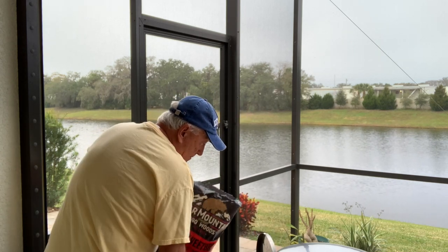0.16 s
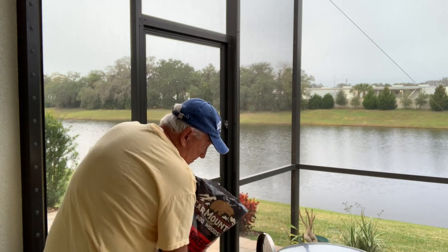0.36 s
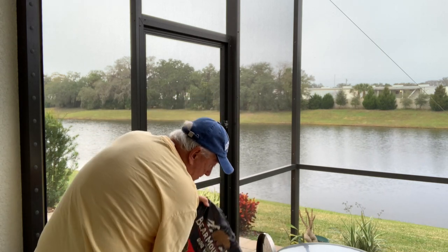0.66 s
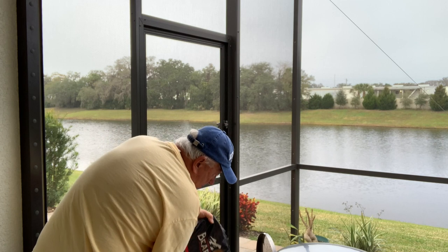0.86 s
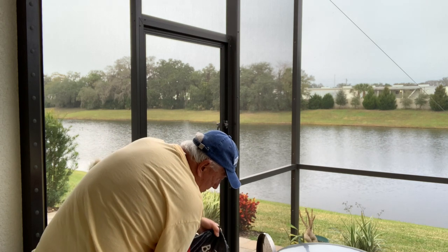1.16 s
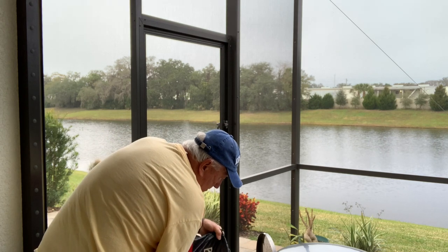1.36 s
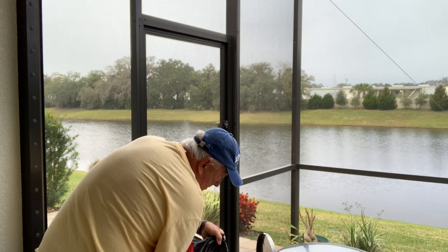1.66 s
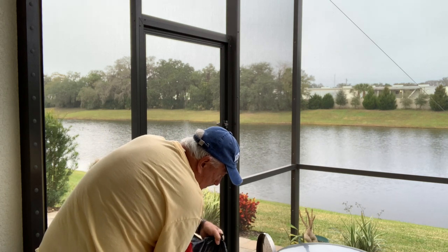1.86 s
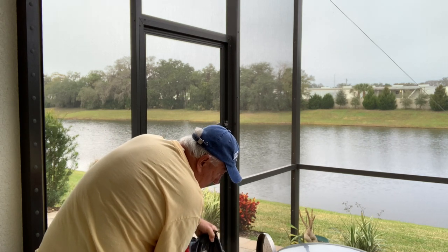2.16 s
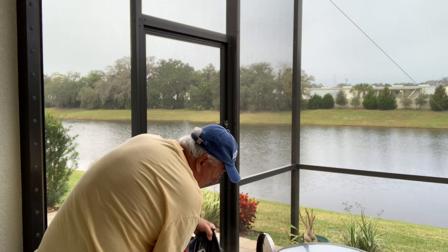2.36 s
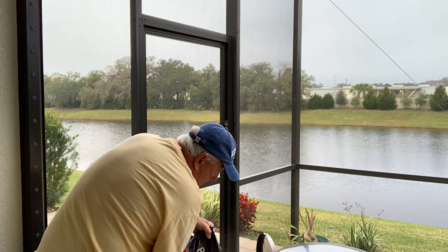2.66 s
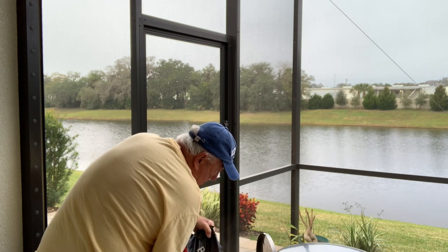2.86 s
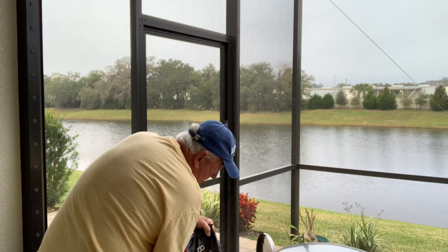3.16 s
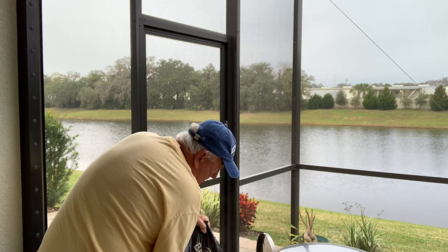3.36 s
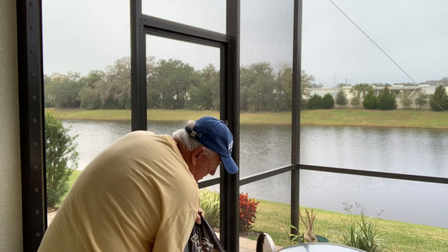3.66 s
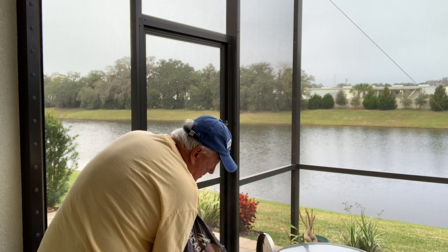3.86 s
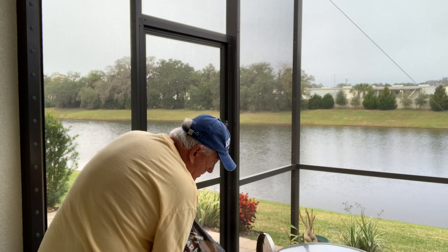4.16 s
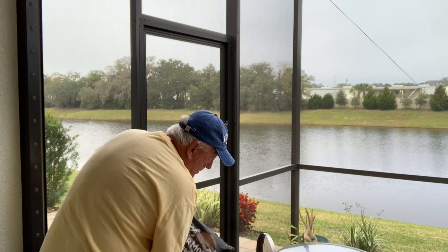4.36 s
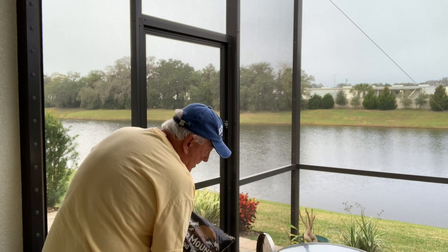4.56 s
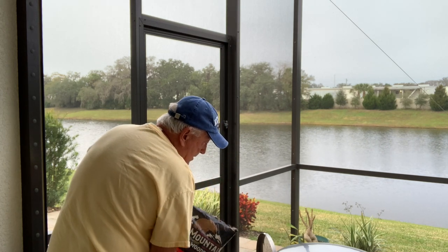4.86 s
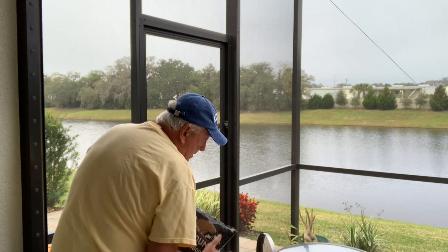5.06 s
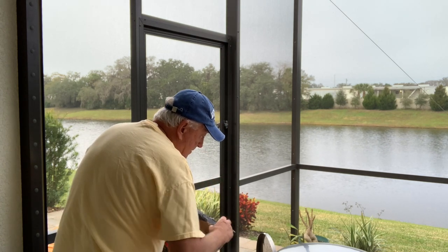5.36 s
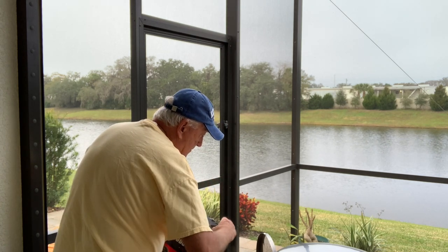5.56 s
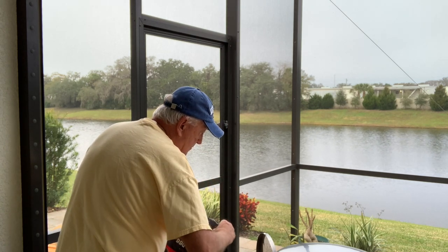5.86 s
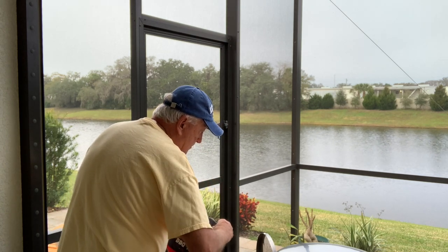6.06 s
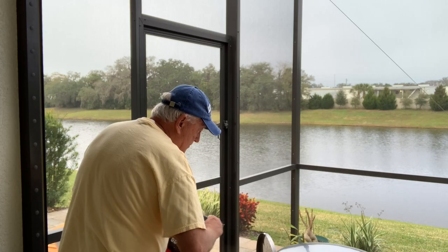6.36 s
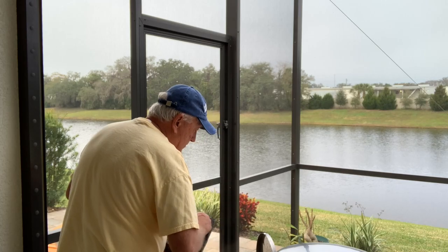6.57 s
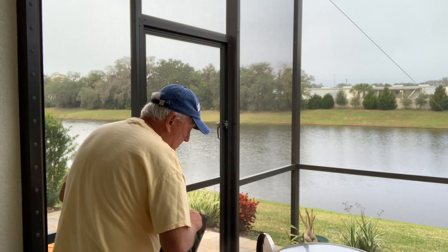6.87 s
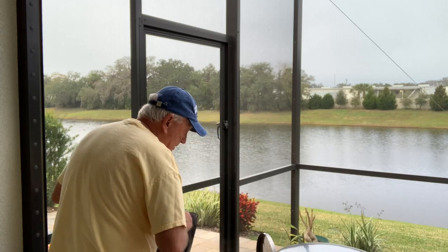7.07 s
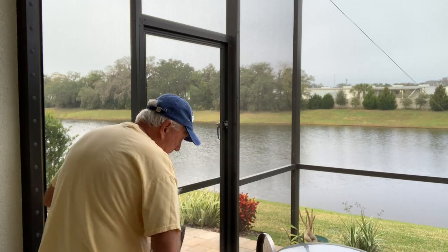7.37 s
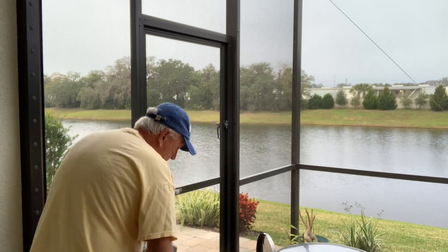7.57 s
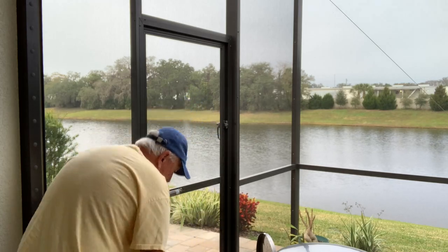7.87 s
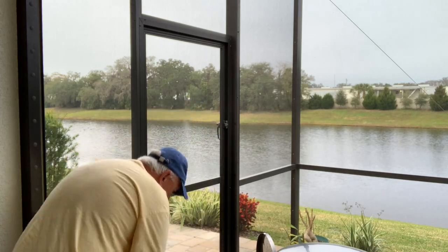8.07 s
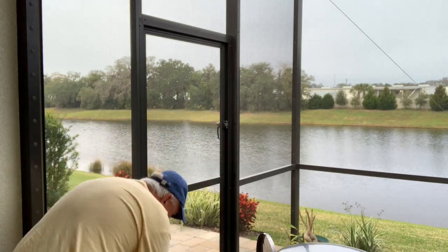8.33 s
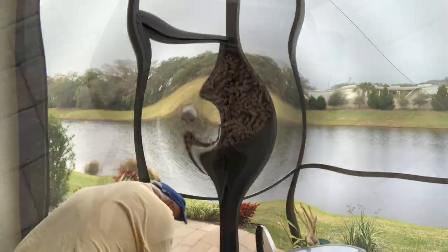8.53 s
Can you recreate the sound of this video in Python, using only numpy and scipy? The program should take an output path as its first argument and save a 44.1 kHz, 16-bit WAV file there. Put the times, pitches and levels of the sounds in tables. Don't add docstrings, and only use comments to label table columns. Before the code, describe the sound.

On a screened porch, a heavy plastic sack of wood pellets crackles and knocks dully in someone's hands. Pellets suddenly pour into an empty steel hopper, pinging, drumming and booming loudly enough to clip, then become muffled as the heap builds. Sharp film snaps follow, then quieter folding and clicking of loose pellets and a rustling set-down. Close stereo handset, faint distant motor hum.

```python
import sys
import numpy as np
from scipy import signal
from scipy.fft import rfft, irfft, next_fast_len
from scipy.io import wavfile
from scipy.ndimage import uniform_filter1d, minimum_filter1d, map_coordinates

SR = 44100
rng = np.random.default_rng(int(sys.argv[2]) if len(sys.argv) > 2 else 0)


def generate_wav(signal):
    frames = np.transpose(np.atleast_2d(signal))
    scaled = np.clip(frames, -1, 1) * 32767
    pcm = np.round(scaled).astype(np.int16)
    wavfile.write(sys.argv[1], SR, pcm)


def invert_db(x):
    u = np.asarray(x, float) / 20
    return 10 ** u


N = 383669

# f/Hz, level/dB [per Hz]
SLIDE = [(250, -36.5), (500, -5.5), (900, 0), (1600, -0.5), (2500, -5), (4000, -12), (7000, -25)]
# f/Hz, level/dB [per Hz]
FILM = [(900, -29), (2000, -4), (3000, -1.5), (5000, 2.5), (7500, 2), (9500, -12), (11500, -22),
        (14000, -5.5)]
# f/Hz, level/dB [per Hz]
FIZZ = [(5000, -22), (8000, -14), (11000, 12), (13500, 8), (15500, 5), (18000, 2.5)]


def unit(x):
    return x / np.sqrt(np.mean(x ** 2) + 1e-20)


def along(points, hz):
    f, v = np.transpose(points)
    return np.interp(np.log(hz + 1), np.log(f + 1), v)


def curves(rows):
    s, *cols = np.transpose(rows)
    return [np.interp(np.arange(N) / SR, s, c) for c in cols]


def wobble(rate):
    knots = rng.standard_normal(int(N * 200 / SR) + 4)
    return map_coordinates(knots, [np.arange(N) * min(rate, 200) / SR])


def filtered(x, response):
    m = next_fast_len(N + 8192)
    return irfft(rfft(x, m) * response(np.fft.rfftfreq(m, 1 / SR)), m)[..., :N]


def colour(points):
    return lambda hz: invert_db(along([(0.95, -120)] + list(points) + [(SR / 2, -60)], hz))


def modes(peaks):
    def response(f):
        total = 0
        for k, (c, w, db) in enumerate(peaks):
            total = total + (-1) ** k * invert_db(db) * 1j * f * w / (c * c - f * f + 1j * f * w)
        return total
    return response


def grains(rate, spread_db, clump_db, smooth):
    when, size, sign = rng.random((3, N))
    hits = (when < rate / SR) * invert_db(-spread_db * np.log(size + 0.022)) * np.sign(sign - .5)
    bed = rng.standard_normal(N)
    clumps = invert_db(clump_db * (0.12 * wobble(20) + 2.06 * wobble(60)))
    return unit(clumps * (unit(hits) + smooth * bed))


def yard():
    # f/Hz, level/dB [per Hz]
    open_air = [(24, -32.5), (40, -4), (117, 5), (294, -5.5), (637, -4), (1190, -8), (1310, -9.5),
                (1730, -9.5), (2110, -13), (3930, -16.5), (7520, -27.5), (11200, -34.5), (15500, -69)]
    # t/s, level/dB
    breeze = [(0.0, -33), (0.14, -48), (0.22, -39), (0.89, -39.5), (1.52, -39), (1.57, -44.5),
              (2.93, -39.5), (3.08, -44.5), (4.07, -37.5), (4.56, -44), (4.7, -42.5), (5.96, -44.5),
              (6.47, -40.5), (8.33, -43), (8.51, -34.5), (8.7, -38)]
    a, b = filtered(rng.standard_normal((2, N)), colour(open_air))
    # f/Hz, ratio
    likeness = [(40, 3.4), (60, 4.2), (300, 0.3), (700, 1.06), (6000, 0.88), (10000, 0.75),
                (12500, 2.3), (15500, 27)]
    a = filtered(a, lambda hz: along(likeness, hz))
    motor = filtered(rng.standard_normal(N), modes([(119, 7.5, 0)]))
    air = unit(np.array([a + b, a - b])) + invert_db(-4.5) * unit(motor)
    bass = filtered(air, lambda hz: 1 / (1 + (hz / 180) ** 4))
    rumble_db, = curves(breeze)
    air_db = -44 + .6 * wobble(2.7)
    return invert_db(rumble_db - 1.5) * unit(bass) + invert_db(air_db) * (air - bass)


def sack():
    # t/s, effort level/dB, tautness of the film/dB
    hands = [(0, -33.5, -4.5), (.29, -42, -2.5), (.38, -30.5, -9.5), (.56, -29.5, -8.5), (.76, -32.5, -9),
             (.945, -35, -4), (.975, -25.5, -3.5), (1.06, -29.5, -0.5), (1.2, -23.5, 4), (1.3, -18.5, 2.5),
             (1.7, -14, -1), (1.9, -24.5, 0.5), (2.57, -33, -0.5), (4.5, -42, -4.5), (4.95, -51.5, -5.5),
             (5.25, -59.5, 0), (5.95, -58.5, -3.5), (6.45, -37, -8.5), (7.1, -50, -9.5), (7.3, -57.5, -4),
             (8.25, -70, -11.5)]
    # peak t/s, fading time/s, effort level/dB, tautness/dB
    grips = [(0.051, 0.04, -31.5, -12), (.15, 0.055, -29.5, -5.5), (0.178, 0.062, -29, -14),
             (1.018, 0.073, -28.5, 11.5), (1.063, .035, -16, 6.5), (1.11, .03, -21.5, 7.5),
             (1.246, 0.042, -15, 4), (1.291, .03, -19, 2), (1.326, 0.066, -11.5, 2), (1.355, .05, -16, 0.5),
             (1.408, 0.13, -14, 2), (1.54, 0.041, -10, 0.5), (1.614, 0.059, -13, 0),
             (1.645, 0.042, -21.5, 3), (1.714, 0.045, -21, -3), (1.978, .05, -31.5, 5),
             (3.047, 0.019, -36.5, 8), (3.098, 0.14, -28.5, 2), (3.135, 0.088, -28, -4.5),
             (3.17, 0.23, -28, 1), (3.46, 0.23, -32.5, 1), (3.57, 0.57, -35, 3.5), (3.83, 0.15, -47.5, 14),
             (4.072, 0.22, -35, -8.5), (4.408, 0.038, -40, -14), (4.511, 0.04, -36.5, -11),
             (4.645, 0.18, -32, -9.5), (4.701, .2, -34, -7.5), (4.75, .2, -31.5, -8),
             (4.791, 0.035, -30.5, -11), (4.83, 0.25, -33.5, -5.5), (4.865, .03, -36, -14),
             (4.887, 0.051, -32.5, -8), (4.92, 0.049, -45, -6), (5.14, 0.22, -46.5, -9),
             (5.5, 0.086, -41, -8), (5.6, .1, -48.5, -6), (5.68, .1, -48.5, -9.5), (5.835, .08, -52.5, -7),
             (5.94, 0.065, -48, -7), (6.13, 0.089, -43.5, -6), (5.42, 0.046, -45, -3),
             (6.25, 0.047, -39.5, -11.5), (6.398, 0.032, -38, -4), (6.64, 0.055, -49, -26.5),
             (6.81, 0.11, -37, -9), (6.979, 0.13, -37.5, -11.5), (7.072, 0.15, -37, -8),
             (7.409, 0.09, -40.5, -5), (7.53, 0.27, -49.5, -9), (7.83, 0.052, -65.5, -9),
             (8.213, 0.034, -41, -5), (8.33, 0.05, -42, 9), (8.383, 0.17, -19.5, -3.5),
             (8.422, 0.43, -23.5, -10.5)]
    # f/Hz, level/dB [per Hz]
    trapped_air = [(60, -35), (110, -12), (170, -4.5), (280, -1), (450, -2), (800, -9.5), (1500, -26.5)]
    per_taut = np.array([-1.033, 0.28, 1.3, 0.6])[:, None]
    per_effort = np.array([0.78, 0.99, 1.0, .93])[:, None]
    usual_db = -35
    rise, fade_db = 0.37, 25.5
    pour_start_s, pour_end_s, pouring_db = .96, 1.85, -7
    turned_s, turned_db = 6.8, -9.5
    t = np.arange(N) / SR

    def power_of(effort_db, taut_db):
        return invert_db(2 * (usual_db + per_effort * (effort_db - usual_db) + per_taut * taut_db))

    power = power_of(*curves(hands))
    for s, fading, db, taut in grips:
        near = slice(max(round((s - 2 * fading) * SR), 0), round((s + 2 * fading) * SR))
        gone = np.where(t[near] < s, (s - t[near]) / rise, t[near] - s) / max(fading, .01)
        power[:, near] += power_of(db, taut) * invert_db(-2 * fade_db * gone)
    thud_gain, slide_gain, film_gain, fizz_gain = np.sqrt(power)

    falling = uniform_filter1d(1.0 * (t > pour_start_s) * (t < pour_end_s), size=4000)
    slide_gain = slide_gain * invert_db(pouring_db * falling)
    shade_db = turned_db / (1 + np.exp(-(t - turned_s) / .05))

    thud_grains = grains(300, spread_db=2.0, clump_db=1.4, smooth=1.0)
    thud = unit(filtered(thud_grains, colour(trapped_air)))
    slide_grains = grains(1500, spread_db=0.0, clump_db=.8, smooth=0.63)
    slide = unit(filtered(slide_grains, colour(SLIDE)))
    creases = grains(3000, spread_db=1, clump_db=1.3, smooth=0.92)
    film = unit(filtered(creases, colour(FILM)))
    fizz = unit(filtered(creases, colour(FIZZ)))
    loose_pellets = grains(120, spread_db=2.5, clump_db=4.5, smooth=.1)
    strays = unit(filtered(loose_pellets, colour([(700, -28.5), (1500, -8.0), (3500, 8), (7000, -14.5)])))

    low = invert_db(-10.5) * thud_gain * thud
    middle = slide_gain * (invert_db(-1.0) * slide + invert_db(-13) * strays)
    high = invert_db(0.1) * film_gain * film + invert_db(shade_db - 5.0) * fizz_gain * fizz
    return low + middle + high


def knocks():
    # t/s, peak level/dB, f/Hz, t60/s
    blows = [(0.312, -17, 794, 0.024), (.312, -19.5, 1150, 0.024), (0.554, -18, 790, 0.019),
             (4.016, -27, 224, 0.029), (5.05, -30, 200.6, 0.026), (5.412, -33, 2300, 0.012),
             (5.464, -33, 1920, 0.02), (5.496, -20, 1380, 0.011), (5.94, -35.5, 1590, 0.016),
             (5.483, -31, 1620, 0.01), (5.589, -35, 1370, .015), (5.826, -41, 1580, 0.018),
             (5.88, -35, 1610, 0.013), (5.995, -35, 1630, .015), (6.007, -37, 1070, .015),
             (6.307, -42, 1810, 0.0099), (6.382, -26, 1380, .015), (6.495, -29, 1708, 0.017),
             (6.711, -35, 1740, 0.012), (6.885, -34, 1130, 0.026), (7.402, -29, 1430, .015),
             (8.212, -31, 1100, .015), (8.26, -39, 1380, .015), (3.139, -26, 1050, 0.027),
             (3.158, -26, 1470, .03), (4.79, -20.5, 705, 0.021), (3.374, -34, 340, 0.028),
             (5.665, -26.5, 530, 0.011), (6.119, -21.5, 1620, 0.014), (6.356, -24, 292, 0.024),
             (6.392, -17.5, 1500, 0.017), (6.509, -31, 1076, 0.098), (6.67, -30, 316, 0.057),
             (7.078, -32, 277, 0.019), (7.379, -30, 700, 0.015), (7.535, -38, 205, 0.07),
             (7.534, -25, 1700, 0.016), (7.536, -32, 2320, 0.014), (7.727, -32.5, 576, 0.024),
             (7.786, -34, 2580, 0.019), (7.816, -37, 2030, 0.019), (8.152, -33, 1500, 0.008),
             (8.383, -22, 494, 0.053), (8.491, -32, 453, 0.05)]
    slump_s, slump_db, slump_t60 = .162, -28, 0.45
    slump_hz, sink_s = 300, .028
    out, cracks, t = np.zeros(N + SR), np.zeros(N + SR), np.arange(SR // 4) / SR
    for s, db, hz, t60 in blows:
        at = slice(round(s * SR), round(s * SR) + len(t))
        turns = 2 * np.pi * hz * (t - (hz < 350) * 3 * t * t)
        note = np.sin(turns) + 0.21 * np.sin(1.3 * turns)
        out[at] += invert_db(db + 5.0 - 60 * t / t60) * (1 - np.exp(-t / 0.0013)) * note
        cracks[at] += (hz > 350) * invert_db(db + 0.5 - 60 * t / 0.032) * rng.standard_normal(len(t))
    turns = 2 * np.pi * np.cumsum(100 + slump_hz * np.exp(-t / sink_s)) / SR
    swell = invert_db(slump_db - 60 * t / slump_t60) * (1 - np.exp(-t / 0.0067))
    out[round(slump_s * SR):][:len(t)] += swell * np.sin(turns)
    return out[:N] + filtered(cracks[:N], colour(SLIDE))


def snaps():
    # t/s, peak level/dB, low part/dB, high part/dB
    ticks = [(0.2216, -21, -30, -19), (0.2732, -26, -8, -5), (0.8201, -23, -11, -28.5),
             (3.8165, -16.5, -35, 4), (4.0532, -13.5, -21, -2.5), (4.1626, -26, -17, -14),
             (4.3935, -15.5, -31, -6), (4.576, -36, -19, 9.5), (5.0836, -37, -4, -21),
             (5.1078, -41, 4, -22), (5.15, -37.5, -8, -27.5), (5.2844, -39, 2, -38),
             (5.5855, -38.5, -7, -25), (6.069, -23, -12, -25), (6.122, -23.5, -13, -41.5),
             (6.2102, -43, 7, -11), (6.352, -37.5, 4, -18), (6.391, -23, -6, -41.5), (6.462, -33, 2, -28),
             (6.7321, -25.5, -6, -33), (6.782, -26, -9, -9.5), (6.961, -28.5, -12, -11.5),
             (7.0522, -26.5, -4.5, -28.5), (7.38, -27, -7, -20.5), (7.534, -23, -14, -19.5),
             (7.784, -42, -1.5, -33), (7.813, -32.5, -3, -45), (8.152, -36, 2, -30), (8.313, -31, -12, -25),
             (6.033, -32.5, -12, -19), (5.663, -43, -6.5, -25), (8.012, -23.5, -17.5, -16),
             (8.0767, -19.5, -21, -11.5), (8.2887, -19.5, -21, -54), (8.412, -31.5, -13, -12.5),
             (8.6514, -19, -15, -9.5)]
    # t/s, peak level/dB, low part/dB, high part/dB
    folds = [(0.96, -5.5, -43, -14), (1.0138, -6.5, -12, -12.5), (2.485, -13, -34, -6), (2.57, -6, -28, -7),
             (2.6054, -13.5, -30, -8.5), (2.657, -16.5, -9, 2.5), (2.8, -24, 1.5, -9),
             (2.8698, -8.5, -27, -16.5), (3.042, -37.5, 13.5, -20.5), (3.089, -11, -15, -21.5),
             (3.4393, -8.5, -12.5, -15.5), (3.552, -5, -24, -7), (3.5709, -3.5, -18, -7),
             (3.687, -13.5, -13, -11), (3.8012, -13, -34, -14), (3.814, 3, -41, -19),
             (4.151, -23.5, -4, 1.5), (4.345, -18.5, -9, -10), (4.6184, -30, -24, -0.5),
             (4.6872, -18.5, -16, -7), (4.7294, -20.5, -19, -7), (4.786, -22, -3, -3),
             (5.995, -31, -17, -10), (6.0354, -32, -12, -3), (6.2422, -30, -5, -23),
             (6.5082, -27.5, 4, -33), (8.355, -15, -30, -14), (8.3994, -19, -13, 8),
             (8.6049, -21.5, -4, -17), (8.67, -27.5, -5, -16)]
    parts, t = np.zeros((3, N + SR)), np.arange(SR // 8) / SR

    def add(s, db, low_db, high_db, shape):
        tones = rfft(rng.standard_normal(len(t)) * shape)
        even = irfft(tones / (abs(tones) + .15 * abs(tones).mean()), len(t))
        even = even * np.clip(8 * shape / shape.max(), 0, 1)
        burst = even * np.linalg.norm(shape) / np.linalg.norm(even)
        gains = invert_db(np.array([[db + low_db + 17.0], [db + 0.5], [db + high_db + .1]]))
        parts[:, round(s * SR):][:, :len(t)] += gains * burst

    rise_s, echo_s = 0.0029, .0023
    for fold in folds:
        add(*fold, 0.29 * t / rise_s * np.exp(1 - t / rise_s))
    for tick in ticks:
        crack = 0.33 * invert_db(-60 * t / 0.0018)
        off_tiles = 0.89 * (t > echo_s) * invert_db(-60 * (t - echo_s) / 0.0093)
        add(*tick, crack + off_tiles)
    return sum(filtered(p[:N], colour(c)) for p, c in zip(parts, (SLIDE, FILM, FIZZ)))


def stream():
    # t/s, level/dB
    flow = [(.945, -68), (.965, -47.5), (1.02, -38), (1.065, -31), (1.2, -32), (1.28, -30), (1.308, -24),
            (1.35, -24.5), (1.385, -34.5), (1.41, -22), (1.47, -28.5), (1.53, -25), (1.62, -22),
            (1.73, -23.5), (1.85, -26), (2.4, -36), (3.4, -39.5), (4.5, -52.5)]
    wall_hz = [1250, 1387, 1459, 1619, 1702, 1754, 1796, 2075, 2149, 2240, 2461, 2693, 3280, 3750, 4690]
    # width/Hz, level/dB
    wall_notes = [(14, 1), (20, -3), (14, 0), (18, 8), (22, 4), (14, 4), (18, 1), (25, 1), (18, 5), (28, 2),
                  (20, 1), (28, 0), (80, -6), (150, -4), (70, -4)]
    # f/Hz, width/Hz, level/dB
    dull = (1900, 600, -11)
    # f/Hz, width/Hz, level/dB
    hollow = [
        (255, 8, 0),
        (305, 36, 3),
        (362, 34, 5),
        (404, 20, 0),
    ]
    # f/Hz, width/Hz, level/dB
    plate = [
        (1619, 24, 7),
        (2230, 40, -4),
        (3410, 140, 3),
        (3680, 150, 3),
    ]
    walls_db, buried_s, bury_s, buried_db = 11, 1.91, 0.12, -33
    bottom_db, covered_s, cover_db_per_s = 11, 1.14, 55
    stiffens_s = 1.04

    blows = grains(2500, spread_db=7.0, clump_db=1.0, smooth=0.35)
    t, (boom_db,) = np.arange(N) / SR, curves(flow)
    drum_db = boom_db + walls_db + buried_db / (1 + np.exp(-(t - buried_s) / bury_s))
    ping_db = boom_db + bottom_db - cover_db_per_s * np.maximum(t - covered_s, 0)

    loaded = 1 / (1 + np.exp(-(t - stiffens_s) / 0.014))
    below = np.roll(blows, SR)
    bare_ping = filtered(below, modes(plate[:3]))
    loaded_ping = filtered(below, modes(plate[:2] + plate[3:]))
    ping = (1 - loaded) * bare_ping + loaded * loaded_ping

    empty = 1 / (1 + np.exp((t - 2.3) / 0.11))
    deepest = unit(filtered(blows, modes(hollow[:1])))
    boom = unit(filtered(blows, modes(hollow[1:]))) + 0.48 * empty * deepest

    walls = [(hz, *note) for hz, note in zip(wall_hz, wall_notes)] + [dull]
    drum = unit(filtered(blows, modes(walls)))
    return invert_db(drum_db) * drum + invert_db(boom_db - 1.0) * boom + invert_db(ping_db) * unit(ping)


def ports(x):
    # t/s, lag [samples]
    trail = [(0, 1.5), (.9, 3), (3.8, 3), (4.6, .5), (5.6, 1.5), (6.8, 1), (7.1, -5), (7.8, -4.5),
             (8.1, -2), (8.7, -2)]
    lag, = curves(trail)
    return np.array([map_coordinates(x, [np.arange(N) - side * lag / 2], order=3) for side in (1, -1)])


def porch(x, count=4):
    # f/Hz, t60/s
    ringing = [(150, 0.7), (1000, 0.16), (4000, 0.26), (12000, 0.19)]
    hz, t, z = signal.stft(rng.standard_normal((count, 2, SR // 2)), SR, nperseg=256)
    # f/Hz, ratio
    width = [(200, .35), (450, 0.57), (700, 2.15), (7000, 0.13), (9000, 4.5), (12500, 0.31)]
    z[:, 1] *= along(width, hz)[:, None]
    far_wall = 1.0 + 0.63 * np.exp(-((t - .028) / 0.0048) ** 2)
    decay = invert_db(-60 * t / along(ringing, hz)[:, None])
    tails = signal.istft(z * far_wall * decay, SR, nperseg=256)[1]
    tails = np.stack([tails[:, 0] + tails[:, 1], tails[:, 0] - tails[:, 1]], axis=1)
    turn = np.arange(N) / SR / .12
    out = 0
    for k, tail in enumerate(tails):
        distance = abs((turn - k + count / 2) % count - count / 2)
        share = np.cos(np.pi / 2 * np.clip(distance, 0, 1))
        late = np.pad(x * share, (150, 0))[None]
        out = out + signal.oaconvolve(late, tail / np.linalg.norm(tail[0]), axes=1)[:, :N]
    return out


def scene():
    bulk, steel, single = sack(), stream(), snaps() + knocks()
    direct = invert_db(0.5) * ports(bulk + steel + single)
    echo = porch(invert_db(-0.5) * bulk + invert_db(-5.0) * steel + invert_db(1.5) * single)
    return direct + echo + yard()


def narrowed_treble(x):
    dropped = (7886, 10210, 12360)
    hz, _, whole = signal.stft(np.array([x[0] + x[1], x[0] - x[1]]) / 2, SR, nperseg=2048)
    whole = whole * (hz[:, None] < 15850)
    band = hz[:, None] + 340 * rng.integers(-1, 2, (3, 1, whole.shape[-1]))
    weak = whole * [(band[0] > dropped[0]) & (band[1] < dropped[1]), band[2] > dropped[2]]

    treble = np.abs(signal.stft(np.diff(x[0], 2, prepend=[0, 0]), nperseg=256)[2]).sum(0)
    attack = np.pad(treble[2:] / (treble[:-2] + 1e-9), (2, 0)) > 3.8
    after = -minimum_filter1d(-1.0 * attack, size=17, origin=6)
    kept = after * (treble > -.42 * minimum_filter1d(-treble, size=25))
    kept = np.interp(np.arange(N), 128 * np.arange(len(kept)), kept)

    whole, weak = (signal.istft(z, SR, nperseg=2048)[1][:, :N] for z in (whole, weak))
    mid, side = whole - (1 - kept) * weak
    return np.array([mid + side, mid - side])


def top_cut(x):
    return signal.sosfilt(signal.butter(12, 15790, fs=SR, output="sos"), x)


def record(dry):
    mix = np.clip(narrowed_treble(dry), -1, 1)
    return top_cut(mix)


dry = scene()
out = record(dry)
generate_wav(out)
```